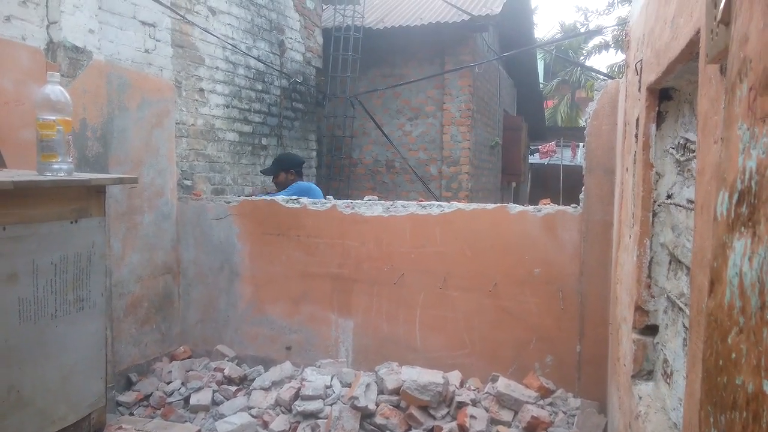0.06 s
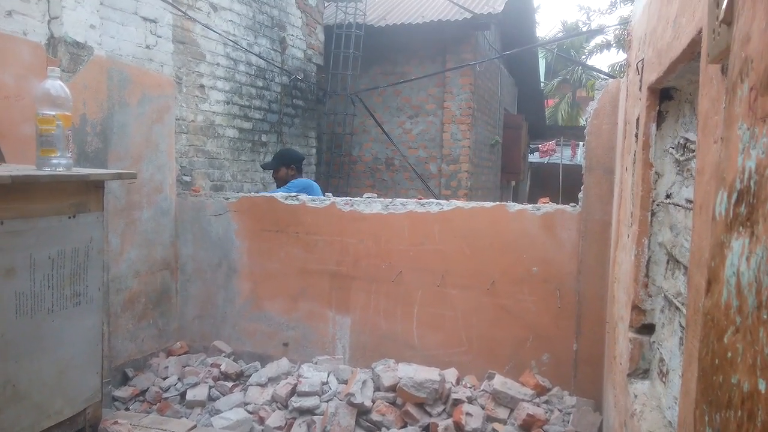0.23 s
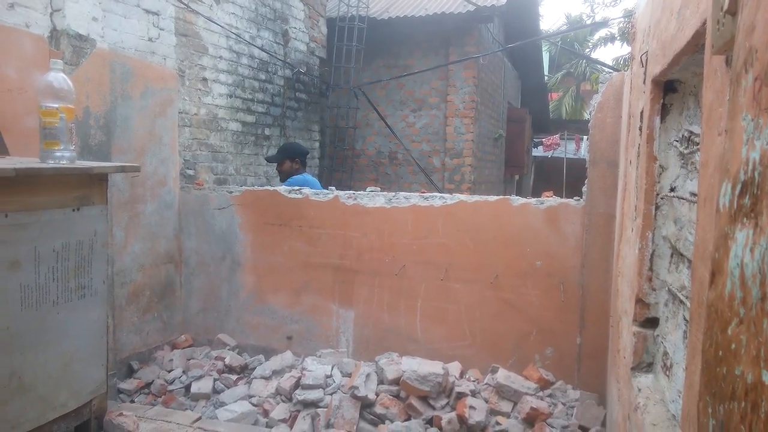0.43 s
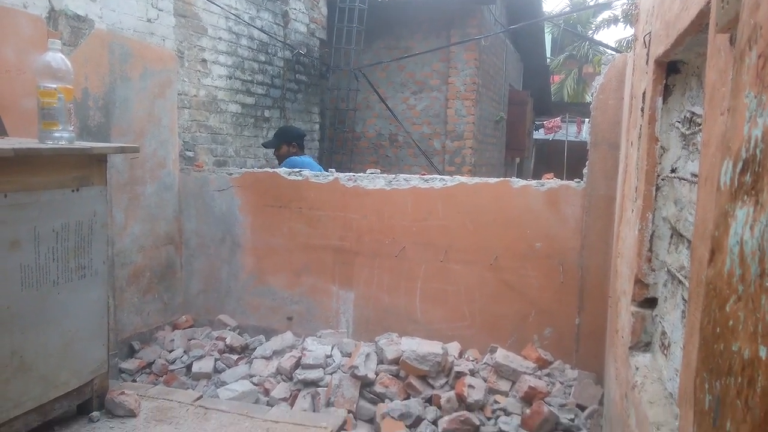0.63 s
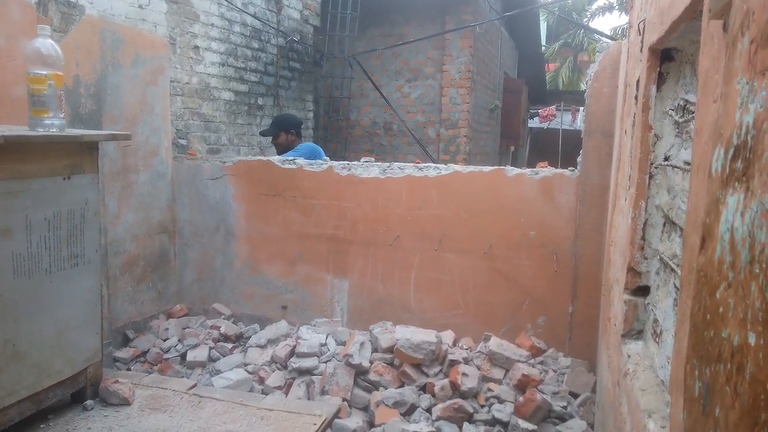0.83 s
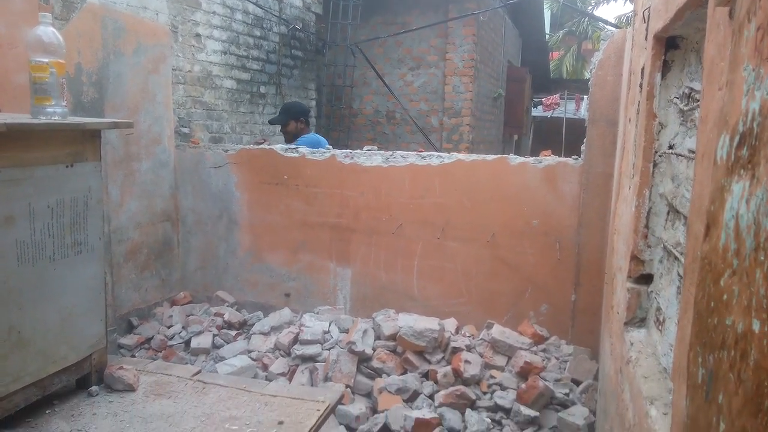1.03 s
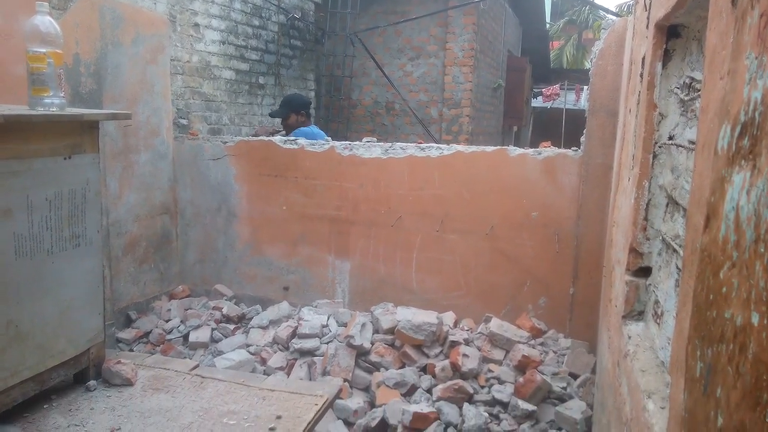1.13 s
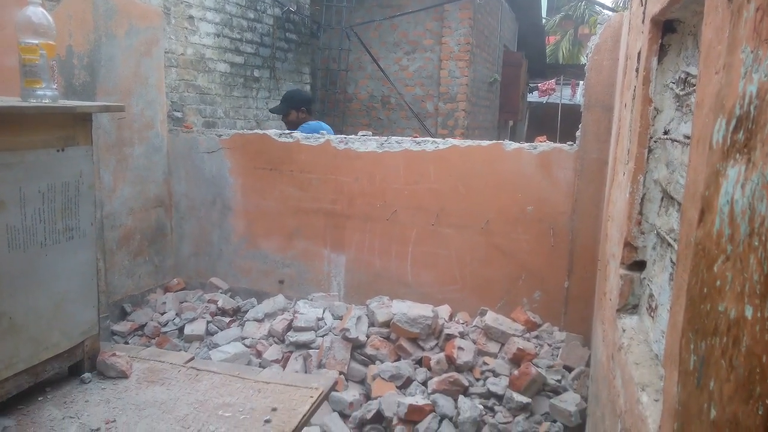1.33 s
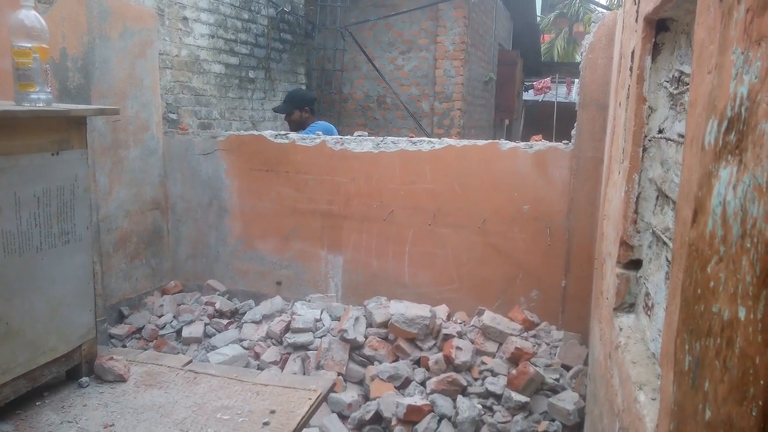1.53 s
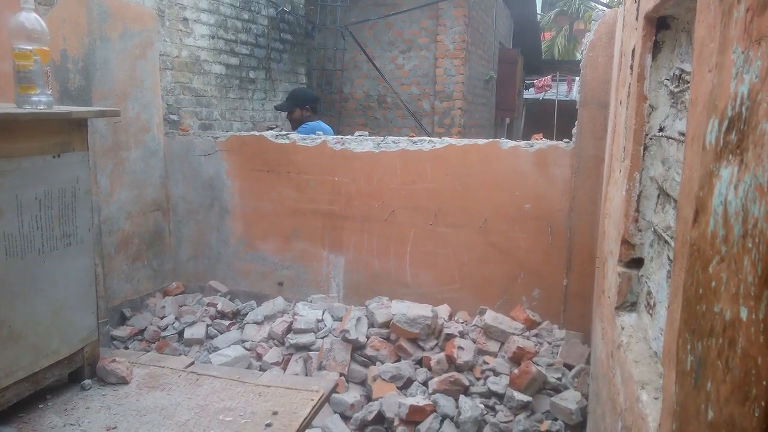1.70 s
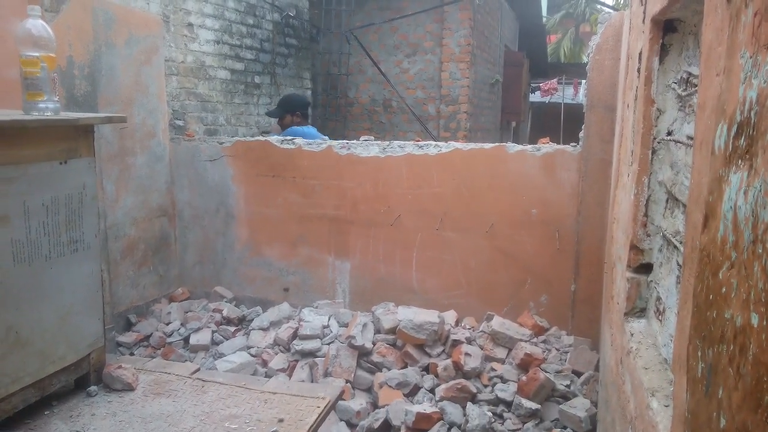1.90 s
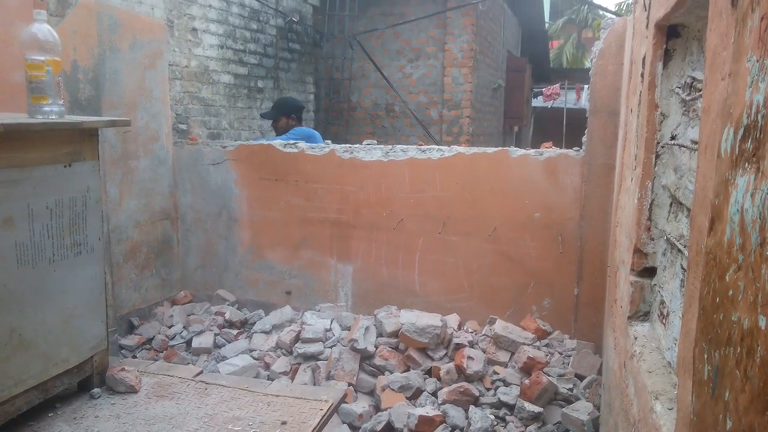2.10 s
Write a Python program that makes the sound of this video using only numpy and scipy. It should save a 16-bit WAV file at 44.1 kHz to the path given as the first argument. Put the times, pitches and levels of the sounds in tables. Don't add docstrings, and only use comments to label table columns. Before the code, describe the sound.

Hammer blows break a brick wall. Lighter knocks at 0.15 and 0.23 seconds lead to a hard crack at 0.36; faint taps follow at 0.67 and 0.83. The heaviest blow lands at 0.99, another at 1.62, then a weaker double knock near 1.86. Chips and grit scatter onto rubble between, strongest after 1.0. Short yard echo, faint town rumble, duller left side, clipped peaks.

```python
import sys
import numpy as np
from scipy import signal
from scipy.fft import rfft, irfft, next_fast_len
from scipy.io import wavfile
from scipy.ndimage import map_coordinates

SR = 44100
rng = np.random.default_rng(int(sys.argv[2]) if len(sys.argv) > 2 else 0)


def invert_db(x):
    u = np.asarray(x, float) / 20
    return 10 ** u


def to_wav(sig):
    pcm = np.clip(np.atleast_2d(sig), -1, 1) * 32767
    pcm = np.round(pcm).astype(np.int16)
    wavfile.write(sys.argv[1], SR, pcm.T)


N = 94815

# start_s, crack_db, boom_db, thud_db, knock_db
BLOWS = [(0.1526, -39.5, -42.5, -38.5, -36.5), (0.168, -20, -40, -33, -30.5),
         (0.2304, -20.5, -69, -62, -46), (0.2354, -10, -54.5, -39.5, -29),
         (0.3587, -3.5, -28.5, -28.5, -18.5), (0.3643, -9, -32, -16, -9.5), (0.6656, -37, -52, -93, -38.5),
         (0.829, -26.5, -58.5, -39, -41.5), (0.9938, 0, -22.5, -15, -8.5), (1.6197, -4.5, -19.5, -15, -12),
         (1.8528, -23.5, -30.5, -21.5, -12.5), (1.8651, -11.5, -33, -44, -20)]
BRICK_PITCH = [0.87, .9, 1, 1.13, 1.4, 1.08, 0.82, 0.953, 1.03, 0.92, 0.87, 1.13]
BLOCK_PITCH = [1.1, 1.05, 1.05, 1.08, .75, 0.76, .8, .9, .85, .98, 1.25, 1.1]
# centre_hz, width_hz, level_db
BOOM_MODES = [(38, 26, -6), (61.4, 33, -5), (92, 20, 1), (118, 18, -1.5), (148, 16.3, 3), (197, 56, 0)]
# centre_hz, width_hz, level_db
BLOCK_MODES = [(251, 85, -0.12), (392, 204, 0.0021)]
# centre_hz, width_hz, level_db
BRICK_MODES = [(531, 52, -1.5), (669, 205, 9), (857, 260, 5.5), (1152, 306, -0.5)]
# centre_hz, width_hz, level_db
FRACTURE_MODES = [(1497, 710, 0.5), (2350, 1700, -3), (3200, 1200, -6.5), (4600, 2500, -10.5)]
# start_s, peak_db, pitch_hz, sharpness_q, length_s
CHIPS = [(0.114, -35.5, 3060, 0.59, 0.0074), (0.129, -31.5, 3600, 0.91, 0.0078),
         (.2305, -13, 3400, 1.9, 0.015), (0.33, -30, 6500, 1.1, .002), (.503, -17.5, 3500, 0.52, .003),
         (.542, -25.5, 5030, 0.61, 0.0028), (0.61, -28, 7400, 2.5, 0.0031), (.666, -27, 5500, 1.1, 0.0061),
         (0.727, -32, 6000, 2.5, 0.0024), (0.831, -13.5, 2400, 0.5, 0.0021),
         (0.904, -37.5, 2400, 8.8, 0.0084), (0.924, -51, 2360, 6.5, 0.0057), (1.095, -23, 4500, .8, .004),
         (1.114, -22, 3660, 2.2, 0.0068), (1.15, -27, 4500, 1.9, 0.013), (1.222, -32, 4400, 1.1, 0.0015),
         (1.254, -38, 4030, 2.3, 0.0037), (1.281, -35, 4500, 1.6, 0.0013),
         (1.421, -29.5, 4000, 0.96, 0.0068), (1.472, -40.5, 4040, .8, .008), (1.745, -32, 3200, 2.4, 0.012),
         (1.825, -33, 2900, 1.1, 0.019), (1.857, -19.5, 3000, 0.55, 0.017), (1.894, -43, 3000, 0.98, 0.001)]
# time_s, level_db
GRIT_LEVEL = [(0, -56), (0.098, -63), (.15, -44), (0.301, -48.5), (.55, -53), (.8, -75), (.98, -60),
              (1.029, -36.5), (1.168, -51), (1.22, -56.5), (1.33, -96), (1.6, -60), (1.661, -48.5),
              (1.8, -60), (1.9, -51), (2.15, -62)]
# frequency_hz, t60_s
YARD_T60 = [(70, 0.63), (150, .36), (400, 0.25), (800, 0.23), (1500, 0.24), (3000, 0.21), (7000, 0.24)]
# frequency_hz, density_db_per_hz
TOWN_SPECTRUM = [(15, -63), (25, -31.5), (82, -9), (208, -4), (253, -15.5), (385, -8), (934, -18),
                 (3440, -16.5), (9000, -29.5), (11700, -91), (19800, -120)]
# time_s, level_db
TOWN_SWELL = [(0, -56), (.15, -59.5), (.55, -51.5), (0.799, -55), (1.25, -49), (1.55, -56.5), (2.0, -52.5),
              (2.15, -54)]
# centre_hz, width_hz, level_db
HUM_MODES = [(103, 16, -17.5), (192, 12, -3), (430, 30, -8.5)]
# frequency_hz, likeness_0_to_1
LIKENESS = [(60, 1), (200, 0.92), (600, 0.8), (1000, 0.27), (1600, 0.067), (4000, 0.048)]
# frequency_hz, gain_db
LEFT_PORT = [(60, -5.5), (150, -8.5), (300, -8), (700, -4), (1400, -9), (2400, -17), (5000, -21),
             (9000, -24)]
# frequency_hz, gain_db
MIC = [(20, -3.5), (50, -10), (110, -0.5), (1800, 1.5), (2400, 6), (3200, -1), (6800, -3), (8200, -19.5),
       (16000, -38.5)]

BOOM_DB, THUD_DB, KNOCK_DB, CRACK_DB = 8.5, 8, 6, 1.5
BOOM_LATE_S = 0.01148
CRUMBLE_S, CRUMBLE_DB = 0.0023, 4
LEAD_S, LEAD_DB = 0.0018, -13
CHIP_RISE_SHARE = 0.07
GRIT_PER_S, GRIT_HZ, GRIT_SPREAD_DB, GRIT_TOP = 900, 3800, 4, 3.2
YARD_DB, CHIP_YARD_DB, GRIT_YARD_DB, YARD_RISE_S = 3, -4.5, 0.52, 0.0051
TOWN_LEFT_DB, TOWN_WOBBLE_DB, TOWN_WOBBLE_HZ, HUM_DB = -7, 1.5, 9, -60
BIRD_S, BIRD_LENGTH_S, BIRD_HZ, BIRD_FALL_HZ, BIRD_DB = 0.05, 0.05, 5230, 200, -52
CLIP, CLIP_HARD, HISS_DB = 1.0, 8, -90.5


def blows():
    out = np.zeros((2, N))
    u = np.arange(SR // 4) / SR / CRUMBLE_S
    for (start_s, crack_db, boom_db, thud_db, knock_db), brick, block in zip(BLOWS, BRICK_PITCH, BLOCK_PITCH):
        knock = struck(retuned(BRICK_MODES, brick), knock_db + KNOCK_DB)
        thud = struck(retuned(BLOCK_MODES, block), thud_db + THUD_DB)
        dull = merged(knock, thud)
        bright = merged(dull, struck(FRACTURE_MODES, crack_db + CRACK_DB))
        boom = struck(BOOM_MODES, boom_db + BOOM_DB, BOOM_LATE_S)
        crumbs = pair(rng.standard_normal((2, len(u)))) * u * np.exp(-u)
        crumbs = crumbs / np.linalg.norm(crumbs[1])
        crumble = signal.fftconvolve(crumbs, bright[None], axes=1)
        add(out, invert_db(LEAD_DB) * np.array([-dull, -dull]), start_s - LEAD_S)
        add(out, yard(bright + boom, YARD_DB), start_s)
        add(out, invert_db(CRUMBLE_DB) * crumble, start_s)
    return out


def chips():
    out = np.zeros((2, N))
    t = np.arange(2048) / SR
    for start_s, peak_db, pitch_hz, q, length_s in CHIPS:
        rise = 1 - np.exp(-t / CHIP_RISE_SHARE / length_s)
        splinter = rng.standard_normal(len(t)) * np.exp(-t / max(length_s, 5e-4)) * rise
        click = filtered(splinter, lambda hz: body([(pitch_hz, pitch_hz / q, 0)])(hz) ** 1.3)
        add(out, yard(invert_db(peak_db) * click / np.abs(click).max(), CHIP_YARD_DB), start_s)
    return out


def grit():
    count = int(GRIT_PER_S * N / SR)
    when = rng.random(count) * N
    pitch = np.clip(GRIT_HZ * np.exp(0.45 * rng.standard_normal(count)), 800, 9000)
    size = np.minimum(rng.exponential(1, count), GRIT_TOP)
    cycles = np.arange(128) / SR * pitch[:, None]
    grains = invert_db(GRIT_SPREAD_DB * size)[:, None] * np.sin(2 * np.pi * cycles) * np.exp(-cycles / 2.3)
    where = when.astype(int)[:, None] + np.arange(128)
    rain = unit(np.bincount(where.ravel(), grains.ravel(), N + 128)[:N])
    level_db = np.interp(np.arange(N) / SR, *np.transpose(GRIT_LEVEL))
    return yard(rain * invert_db(level_db), GRIT_YARD_DB)[:, :N]


def town():
    t = np.arange(N) / SR
    wobble = invert_db(TOWN_WOBBLE_DB * map_coordinates(rng.standard_normal(30), [t * TOWN_WOBBLE_HZ]))
    swell = invert_db(np.interp(t, *np.transpose(TOWN_SWELL)))
    rumble = unit(filtered(pair(rng.standard_normal((2, N))), lambda hz: invert_db(along(TOWN_SPECTRUM, hz))))
    hum = unit(filtered(pair(rng.standard_normal((2, N))), lambda hz: body(HUM_MODES)(hz) ** 2))
    u = np.clip((t - BIRD_S) / BIRD_LENGTH_S, 0, 1)
    phase = 2 * np.pi * np.cumsum(BIRD_HZ - BIRD_FALL_HZ * u) / SR
    bird = invert_db(BIRD_DB) * np.sin(np.pi * u) * np.sin(phase)
    return (swell * rumble * wobble + invert_db(HUM_DB) * hum + bird) * invert_db([[TOWN_LEFT_DB], [0]])


def yard(x, wet_db):
    n = SR // 2
    hz, t, z = signal.stft(pair(rng.standard_normal((2, n))), SR, nperseg=256)
    decay = invert_db(-60 * t / along(YARD_T60, hz)[:, None])
    tail = signal.istft(z * decay, SR, nperseg=256)[1][:, :n]
    tail = tail * (1 - np.exp(-np.arange(n) / SR / YARD_RISE_S))
    tail = invert_db(wet_db) * tail / np.linalg.norm(tail[1])
    tail[:, 0] += 1
    return signal.fftconvolve(x[None], tail, axes=1)


def struck(modes, peak_db, late_s=0):
    hit = signal.unit_impulse(8192, round(late_s * SR))
    x = filtered(hit, lambda hz: body(modes)(hz) ** 1.574)
    return invert_db(peak_db) * x / np.abs(x).max()


def retuned(modes, ratio):
    return [(hz * ratio, width_hz, db) for hz, width_hz, db in modes]


def merged(*parts):
    power = sum(np.abs(rfft(p)) ** 2 for p in parts)
    return irfft(minimum_phase(np.log(power + 1e-18) / 2), len(parts[0]))


def body(modes):
    def power(f):
        return sum(invert_db(2 * db) * (f * w) ** 2 / ((c * c - f * f) ** 2 + (f * w) ** 2) for c, w, db in modes)
    return lambda hz: minimum_phase(np.log(power(hz) + 1e-9) / 2)


def causal(points):
    return lambda hz: minimum_phase(along(points, hz) * np.log(10) / 20)


def minimum_phase(log_gain):
    c = irfft(log_gain)
    c[1:len(c) // 2] *= 2
    c[len(c) // 2 + 1:] = 0
    return np.exp(rfft(c))


def pair(noise):
    def mix(hz):
        alike = np.clip(along(LIKENESS, hz), 0, 1)
        return np.array([np.sqrt(1 - alike ** 2), alike])
    return np.array([filtered(noise, mix).sum(0), noise[1]])


def filtered(x, response):
    n = x.shape[-1]
    m = next_fast_len(n + 8192)
    return irfft(rfft(x, m) * response(np.fft.rfftfreq(m, 1 / SR)), m)[..., :n]


def along(points, hz):
    f, v = np.transpose(points)
    return np.interp(np.log(hz + 1), np.log(f + 1), v)


def unit(x):
    return x / np.sqrt(np.mean(x ** 2) + 1e-20)


def add(out, x, start_s):
    i = round(start_s * SR)
    out[:, i:i + x.shape[1]] += x[:, :out.shape[1] - i]


def scene():
    return blows() + chips() + grit() + town()


def band_limit(x):
    return signal.sosfilt(signal.butter(12, 15900, fs=SR, output="sos"), x)


def record(dry):
    x = filtered(dry, lambda hz: causal(MIC)(hz) * np.array([causal(LEFT_PORT)(hz), np.ones(len(hz))]))
    x = x / (1 + np.abs(x / CLIP) ** CLIP_HARD) ** (1 / CLIP_HARD)
    x = x + invert_db(HISS_DB) * rng.standard_normal(x.shape) * [[0.3], [1]]
    return band_limit(x)


dry = scene()
out = record(dry)
to_wav(out)
```